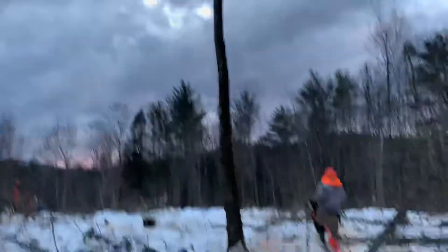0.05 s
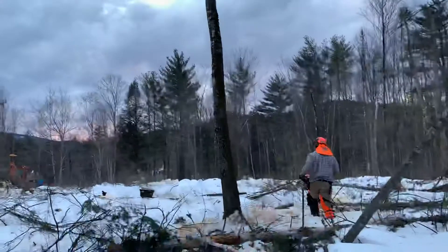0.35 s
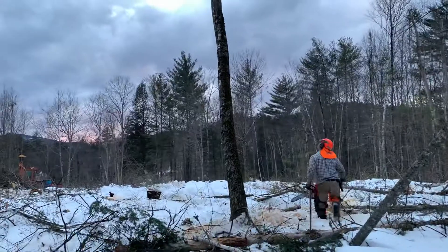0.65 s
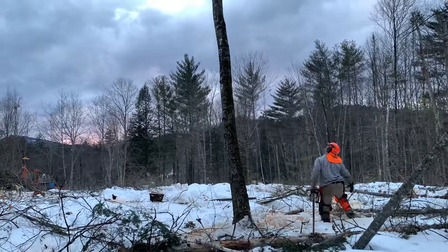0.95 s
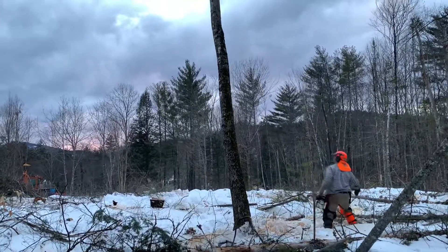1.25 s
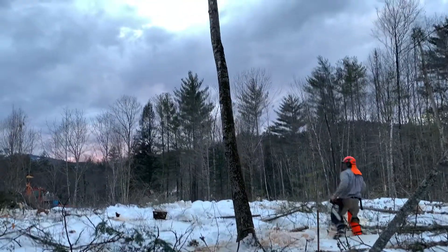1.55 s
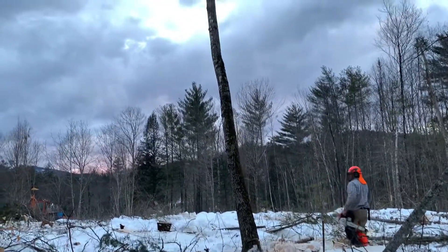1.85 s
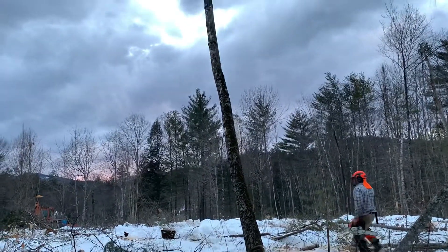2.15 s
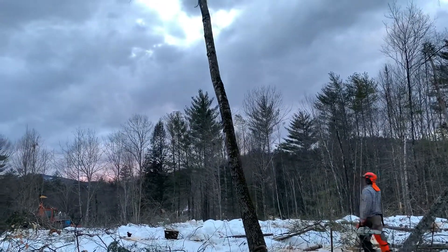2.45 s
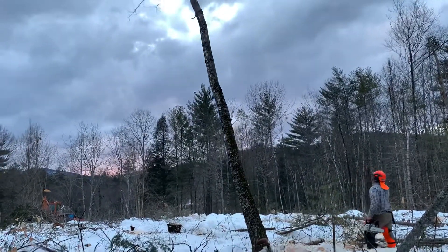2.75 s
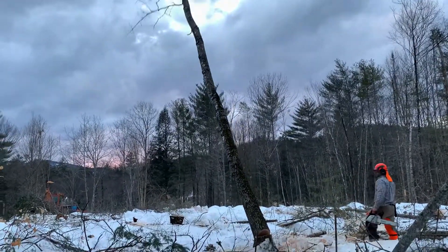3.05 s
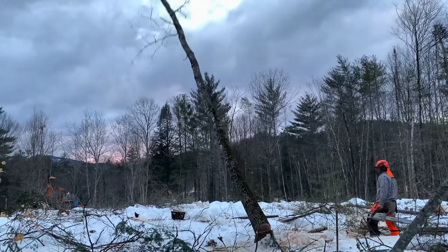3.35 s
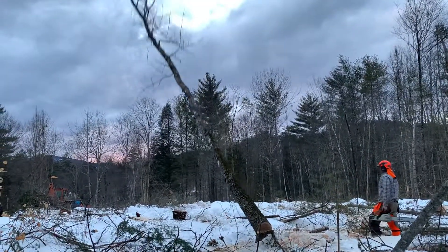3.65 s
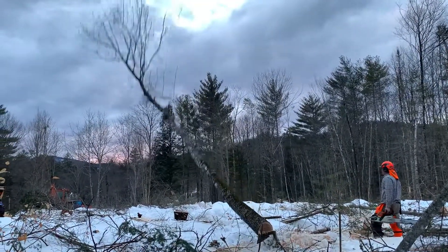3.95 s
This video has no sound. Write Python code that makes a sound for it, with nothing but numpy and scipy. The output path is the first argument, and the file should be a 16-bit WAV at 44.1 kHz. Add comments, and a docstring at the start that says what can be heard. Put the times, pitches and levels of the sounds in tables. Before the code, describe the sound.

A tree trunk cracks as it tips over in a quiet clearing. First a chainsaw coughs to a stop within half a second. Single sharp snaps start around 0.8 seconds and thicken into loud, dense splintering from 1.5 to 3 seconds, over a low groan and a few hollow knocks. From about 3 seconds the wood creaks faster and faster, with two more cracks and a soft thud near 3.8 seconds.

```python
"""Tree falling in snow

A sawn tree tips over in a snowy clearing. The chainsaw coughs to a stop; fibres in the hinge of
uncut wood snap, first singly, then in a dense splintering while the trunk groans. As the fall
gathers speed the hinge creaks in a quickening run of slips, and two last fibres break."""
import sys
import numpy as np
from scipy import signal
from scipy.fft import rfft, irfft, next_fast_len
from scipy.io import wavfile
from scipy.ndimage import uniform_filter1d

SR = 44100
rng = np.random.default_rng(int(sys.argv[2]) if len(sys.argv) > 2 else 0)


def wrap_up_sound(samples):
    """Save the sound to the file named by the first command line argument, as 16-bit audio."""
    columns = np.atleast_2d(samples).T
    # keep every value between -1 and 1, then stretch to whole-number steps
    tamed = np.clip(columns, -1, 1)
    steps = np.round(tamed * 32767).astype(np.int16)
    wavfile.write(sys.argv[1], SR, steps)


N = 176400
TIME = np.arange(N) / SR

# One hit per breaking fibre: (time [s], level [dB], knock EQ [dB], body EQ [dB], treble EQ [dB])
FIBRE_SNAPS = [(0.634, -42, 20, 25, -8.0), (0.7607, -30, 0.5, -9.0, 23), (0.7753, -6, 13, 11, -5.0),
               (0.777, -18, 15, 10.5, 0), (0.8765, -15.5, 1, 14.5, 4), (1.0074, -42, 18.0, 2.5, 18.0),
               (1.0919, -20.5, 25, 6, -7), (1.147, -28.5, 2, -6.0, 17.5), (1.22, -20, -10.5, -14, -13),
               (1.2236, 3.5, -3.5, -10.5, 2.5), (1.2278, -21, 9, -6, 0), (1.2876, -22, -7, -6.0, 10),
               (1.3222, 0, -12.0, -12, 4.5), (1.34, -8.5, -2.5, -6.0, 9), (1.3738, -4.5, -10, -4.0, 9),
               (1.4427, -24, -4.5, -10.5, 15), (1.4486, -4, -21, -11, 5), (1.4636, -5.5, -5.5, -13, -4),
               (1.4845, -3, 0.5, -5.5, 11.5), (1.4879, 0, -5, -7.0, 4), (1.5051, -5.5, -5.0, -1, -1),
               (1.5192, -11, 1, 3.5, 10), (1.5253, -27, 3, -6.5, 21), (1.558, -5.5, -14, -5.0, 4.5),
               (1.5676, 7.0, -0.5, -5.5, -1.5), (1.5724, -5.5, 15, 1.0, 6), (1.5827, -3, 0.0, -13, -2),
               (1.5944, -11, 12, 4, 11.5), (1.6003, 2, 4, 6, 7), (1.6063, -6, 6, -14, 0.0),
               (1.6105, 0, 4, 6, 4), (1.6302, 1.0, -16.0, -1, -1), (1.6457, -17, -3.0, -7.0, 17),
               (1.659, 3.5, 4, -5, 4.5), (1.673, -12.5, 19, 10, -4), (1.68, -8.5, 21, 7, -3),
               (1.6938, 0.5, -9.0, -15.0, -5), (1.7205, 10.5, 0.5, 4, -4), (1.7324, 4, -4, 1.5, -1.5),
               (1.7509, 11.5, 1.5, 2.0, -7.5), (1.755, 6, 3, -1, -3.5), (1.7585, 4.5, -11.0, -4, -8.5),
               (1.7757, 8.5, -6, 4.5, -4), (1.7918, -1, -3, -2, -3.0), (1.8475, -0.5, -11, -11, -8.0),
               (1.851, -6.5, 7, -7, 3), (1.8661, 0.5, -5, -3, 0), (1.8711, 0.5, -4, -3, 9.5),
               (1.8755, 4, -3, 1, -11), (1.8957, -1.5, 11.5, -4, -2.5), (1.9172, 3, -4, -19, -4),
               (1.9262, -14, 3, -8, 6), (1.9576, -2, -20, -14, -2), (1.9901, -1, -7, -3, -9),
               (1.994, -6.5, -10, -10.5, 13), (2.0248, -5.5, 2.0, 2, 9), (2.0354, -6, 5, -2.5, 1),
               (2.0467, 4.0, -7, -1, -2.5), (2.0653, 1, -8, -2, -7.0), (2.1034, -0.5, 12.5, -8, 1),
               (2.1127, -0.5, 3, -1, -0.5), (2.1195, -4.5, -1, -7, 8.5), (2.1698, -0.5, -11, 3.5, 1.5),
               (2.1906, 10, -12, -7.5, -1.5), (2.2168, 0, -6, 3, 3), (2.2383, 9.5, -7, -4.5, -4.5),
               (2.2468, -2, -7.5, -1, 3), (2.25, 8.0, -9, -12, -1.5), (2.3398, 0.5, -14, -12, 3.5),
               (2.366, 3.5, -15, -5, -4), (2.3806, 3.5, -1, 7.5, 2), (2.4013, 13.0, -1.5, -3.5, -4.0),
               (2.409, 3, -6.5, 0.5, -7.0), (2.4426, 15.5, 0.0, -8.0, -13.5), (2.4719, 0.5, 4, 0, 5),
               (2.4958, 7.5, -3, -6, -3.5), (2.5259, 7, -10.5, -12, -3), (2.5363, 5, 2, -10, -2),
               (2.5563, 2.5, -20, -6.0, -12), (2.5645, 9, -13, -13, -14.0), (2.6698, 14.5, 7, 6, -24),
               (2.7063, 6, 0, -9, -10), (2.715, 8, 3.5, 7.5, -11), (2.7632, 2, 14, 9.5, -10),
               (2.8372, 13, -1.5, -2.0, -14), (2.8532, 3, -10, -6, -8), (2.8575, 13, 0, -1.5, -7.5),
               (2.9719, 7.5, -3.5, 0, -4), (3.0637, 5.5, -6, -3, -5.5), (3.7622, 6, -5, 6, -14),
               (3.784, 5, 5.0, 16.5, -7)]
# EQ shared by all the snaps: (frequency [Hz], level [dB])
SNAP_EQ = [(60, -36), (250, -1), (500, -11), (800, -10), (1100, -5.5), (1700, -4), (2600, 0), (4000, -3.5),
           (5500, -9.5), (7200, -2.5), (11000, -4), (13500, -13), (15300, -10), (16000, -15)]
def fibre_snaps():
    """Each fibre frays, parts with a sharp click and tears out; thick ones have more knock and body."""
    knock_hz, body_hz, edge_hz, treble_hz = 940, 1770, 3700, 9400
    tear_in_s, tear_out_s, fray_s = 0.00071, 0.00097, 0.0014
    out = np.zeros(N)
    t = np.arange(-400, 700) / SR  # the fibre parts at t = 0
    tear = np.exp(np.where(t < 0, t / tear_in_s, -t / tear_out_s))
    tear += from_db(-29) * np.exp(-np.abs(t) / fray_s)
    for s, db, knock_db, body_db, treble_db in FIBRE_SNAPS:
        grit = from_db(-2.5) * unit_energy(rng.laplace(size=len(t)) * tear)
        snap = whiten(grit - (t == 0))
        tone = [(350, 0), (knock_hz, knock_db), (body_hz, body_db), (edge_hz, 0), (treble_hz, treble_db)]
        add(out, s + t[0], from_db(db + 0.48) * eq(snap, tone))
    low_cut = signal.butter(2, 610, "high", fs=SR, output="sos")
    return signal.sosfilt(low_cut, eq(out, SNAP_EQ))


# Fader ride of the small fibres tearing, which also drives their density: (time [s], level [dB])
SPLINTER_RIDE = [(.7, -79), (.94, -64), (1.0, -62), (1.1, -56.5), (1.19, -66), (1.42, -56), (1.54, -53),
                 (1.6, -43.5), (1.7, -50), (1.76, -33), (1.82, -41.5), (1.87, -41.5), (1.96, -43),
                 (2.05, -37), (2.11, -34.5), (2.155, -41.5), (2.23, -30), (2.29, -37), (2.4, -33),
                 (2.48, -33), (2.6, -28), (2.66, -32), (2.78, -37), (2.86, -34.5), (2.92, -37), (3.08, -37),
                 (3.2, -39), (3.36, -39.5), (3.5, -44.5), (4, -51)]
# Bright, crisp EQ of the crackle: (frequency [Hz], level [dB])
SPLINTER_EQ = [(100, -15.5), (500, -3.5), (800, -7), (1100, -3.5), (1700, -3), (2600, 1.5), (4000, -0.5),
               (5500, -1.5), (7500, -0.5), (11000, 0), (13500, -9), (15300, -7), (16000, -20)]
def splinters():
    """Small fibres give way in clumps over a fine hiss: ticks under light strain, crackle under heavy."""
    busy_ticks_per_s, busy_db, clump_db = 1300, -32, 3
    level_db, = over_time(SPLINTER_RIDE)
    chance = (busy_ticks_per_s * from_db(1.25 * (level_db - busy_db)) + 30) / SR
    sizes = unit_rms(from_db(4 * np.minimum(rng.exponential(1, N), 3))) * rng.choice([-1, 1], N)
    ticks = sizes * (rng.random(N) < chance) / np.sqrt(chance)
    hiss = from_db(-9.5) * rng.standard_normal(N)
    crackle = (ticks + hiss) * from_db(clump_db * drift(per_s=60))
    level_db = np.where(TIME < SPLINTER_RIDE[0][0], -120, level_db)  # muted until the ride starts
    return from_db(level_db) * unit_rms(eq(crackle, SPLINTER_EQ))


# Speed and fader ride of the slipping hinge: (time [s], rate [slips/s], level [dB])
CREAK_RIDE = [(2.7, 79, -120), (2.85, 73.5, -41.5), (3.0, 85.6, -39.5), (3.13, 76.4, -36), (3.19, 90, -34),
              (3.25, 93, -35.5), (3.33, 105.5, -33), (3.42, 133, -33.5), (3.48, 142, -33.5),
              (3.565, 148, -32), (3.585, 184, -32.5), (3.65, 191, -32.5), (3.69, 228, -30.5),
              (3.75, 210, -33), (3.82, 275, -34), (3.88, 260, -35.5), (3.94, 226, -36), (4, 251, -37.5)]
# Woody resonances of the creak: (frequency [Hz], level [dB])
CREAK_EQ = [(70, -11), (200, -1), (330, -7), (560, -12.5), (800, -10.5), (1050, 4), (1300, 3), (1580, 4),
            (2000, 2.5), (2350, 6), (2700, 0.5), (3000, -6), (3450, 1.5), (3850, -5), (4280, 2.5),
            (4800, -5.5), (5700, 2.5), (7000, -8.5), (8700, -2), (10800, -3.5), (12200, -15), (13200, -26),
            (16000, -23)]
def hinge_creak():
    """Stick and slip: a click per slip and a short rasp after it, faster as the tree falls."""
    jitter, rasp_cycles = 0.02, 0.4
    rate, level_db = over_time(CREAK_RIDE)
    cycles = np.cumsum(rate * (1 + jitter * drift(per_s=150))) / SR
    strength = from_db(rng.standard_normal(N)) / np.sqrt(rate)
    slips = np.diff(np.floor(cycles), prepend=0) * strength
    rasp = rng.laplace(size=N) * np.exp(-(cycles % 1) / rasp_cycles)
    friction = from_db(-1) * unit_rms(rasp) - unit_rms(slips)
    return from_db(level_db) * unit_rms(eq(friction, CREAK_EQ))


# Low resonances of the trunk: (frequency [Hz], bandwidth [Hz], level [dB])
GROAN_MODES = [(170, 63, -4), (254.5, 34, -1), (299, 56, -5), (361, 72, 2)]
# Fader ride of the groan: (time [s], level [dB])
GROAN_RIDE = [(.7, -83), (.8, -63), (1.05, -66.5), (1.25, -63), (1.53, -74), (1.6, -48.5), (2.0, -52.5),
              (2.35, -50.5), (2.45, -43.5), (2.67, -41.5), (2.8, -40.5), (3.02, -46.5), (3.2, -48.5),
              (3.4, -56), (3.7, -54.5), (3.8, -48), (4, -52)]
def trunk_groan():
    """The tearing shakes the trunk's low modes."""
    level_db, = over_time(GROAN_RIDE)
    modes = sum(from_db(db) * ringing_noise(hz, width) for hz, width, db in GROAN_MODES)
    high_cut = signal.butter(4, 430, fs=SR, output="sos")
    return from_db(level_db) * unit_rms(signal.sosfilt(high_cut, modes))


# One damped tone per hit: (time [s], pitch [Hz], level [dB], 60 dB decay [s])
KNOCKS_AND_THUDS = [(0.793, 298, -37, 0.052), (0.897, 356, -42.5, 0.054), (1.091, 1030, -37, 0.016),
                    (1.673, 880, -35, 0.02), (1.679, 1060, -28, 0.023), (1.906, 262, -36, 0.063),
                    (2.328, 92.5, -31.5, 0.075), (2.61, 348, -35, 0.28), (2.858, 249.6, -22.5, 0.18),
                    (2.858, 309, -26, 0.094), (2.975, 249, -36.5, 0.79), (3.785, 152, -32.5, 0.24),
                    (3.844, 57, -31, 0.19)]
def knocks_and_thuds():
    """Hollow wooden knocks and two low, soft thuds like footsteps in snow."""
    out = np.zeros(N)
    attack = 1 - np.exp(-TIME / 0.0023)
    for s, hz, db, t60 in KNOCKS_AND_THUDS:
        add(out, s, from_db(db - 60 * TIME / t60) * np.sin(2 * np.pi * hz * TIME) * attack)
    return out


# Last firings of the engine: (time [s], level [dB])
ENGINE_COUGHS = [(.001, -6.5), (0.03, -4), (0.06, 1), (.099, -1.5), (0.16, -2), (0.218, -5.5), (0.286, -11),
                 (.374, -12.5)]
# Boomy EQ of a puff: (frequency [Hz], level [dB])
COUGH_EQ = [(50, -15), (130, 11.5), (200, 9.5), (285, 10.5), (480, 0), (800, -13), (1500, -15), (3400, -11),
            (8000, -25), (16000, -39)]
# Fade of the chain running down: (time [s], level [dB])
CHAIN_FADE = [(0, -35), (.09, -42), (.16, -49), (.28, -54.5), (.47, -64.5), (.56, -61.5), (.66, -64),
              (.8, -65)]
# Midrange EQ of the rattle: (frequency [Hz], level [dB])
CHAIN_EQ = [(100, -6), (280, 8.5), (500, -10), (800, -1.5), (1100, -3.5), (1550, 0), (2200, -8.5),
            (4200, -16), (6000, -19.5), (11000, -31.5), (16000, -38)]
def chainsaw():
    """The engine's last puffs slow and weaken while the chain's rattle sinks to a faint trace."""
    gas_decay_s, rattle_db = 0.0076, 4.14
    puffs, t = np.zeros(N), TIME[:SR // 20]
    for s, db in ENGINE_COUGHS:
        gas = unit_energy(rng.standard_normal(len(t)) * np.exp(-t / gas_decay_s))
        add(puffs, s, from_db(db) * whiten((t == 0) + from_db(-3.5) * gas))
    chain_db, = over_time(CHAIN_FADE)
    rattle = from_db(chain_db + rattle_db * drift(per_s=200))
    chain = rattle * unit_rms(eq(rng.standard_normal(N), CHAIN_EQ))
    return eq(puffs, COUGH_EQ) + chain


def snow_bounce(x):
    """The direct sound plus a duller copy that bounces off the snow just behind it."""
    lag_s, gain, high_cut_hz = 0.00116, 0.51, 5100
    dull = signal.lfilter(*signal.butter(1, high_cut_hz, fs=SR), x)
    return x + gain * np.interp(TIME - lag_s, TIME, dull, left=0)


# Stereo image: (frequency [Hz], left phase lead [rad], left minus right [dB])
STEREO_IMAGE = [(300, 0, 0), (550, 0, -2), (1100, -.35, -1.8), (1800, -.8, -1.6), (2400, 0, -.8),
                (3300, .7, -2.5), (4500, .4, -2), (4950, 2, -8), (5800, 2.8, -6), (6600, 3.8, -2.5),
                (7700, 3.9, .5), (8600, 3.1, 0), (10000, 1.1, 0), (11600, -.3, 0), (12700, -2.6, 0),
                (13500, -3.2, 0), (14200, -3.8, 0), (15100, -5.8, 0), (16000, -6.2, 0)]
def stereo_ports(x):
    """Direct sound reaches two microphone ports with phase and level gaps that vary with frequency."""
    size = 2 * next_fast_len(N // 2 + 2048)
    phase, balance_db = over_bins(STEREO_IMAGE, size)
    left = from_db(balance_db / 2) * np.exp(.5j * phase)
    pair_rms = np.sqrt((from_db(balance_db) + from_db(-balance_db)) / 2)
    return irfft(rfft(x, size) * np.array([left, 1 / left]) / pair_rms)[:, :N]


# EQ of the halo around the clicks: (frequency [Hz], level [dB])
HALO_EQ = [(300, -20.5), (700, -0.5), (1500, 2.5), (2000, 6.5), (3500, 3), (5600, 9.5), (8000, -1.5),
           (11000, 5), (16000, -22)]
def stereo_halo(x):
    """A brief noise halo, different on each side, widens each click."""
    blur_s = 0.0012
    pole = np.exp(-1 / (blur_s * SR))
    envelope = np.sqrt(signal.lfilter([1 - pole], [1, -pole], x ** 2))
    return from_db(-10.5) * np.array([eq(envelope * n, HALO_EQ) for n in rng.standard_normal((2, N))])


# EQ on the reverb return: (frequency [Hz], level [dB])
REVERB_EQ = [(100, -1.5), (350, -1.5), (800, 6), (2000, 3.5), (6000, 5), (16000, -11)]
def woods_reverb(x):
    """Scatter from nearby brush and a faint tail from the tree line, different on each side."""
    brush_t60_s, trees_t60_s = 0.1, 0.15
    t, sides = TIME[:SR], []
    for near, far in rng.standard_normal((2, 2, SR)):
        brush = from_db(-16.5) * unit_energy(near * from_db(-60 * t / brush_t60_s))
        trees = from_db(-19.5) * unit_energy(far * from_db(-60 * t / trees_t60_s))
        sides.append(signal.fftconvolve(x, eq(brush + trees, REVERB_EQ))[:N])
    return np.array(sides)


# Dark EQ of the ambience bed: (frequency [Hz], level [dB])
AIR_EQ = [(20, 5.5), (40, 8), (65, 9.5), (95, -4), (160, -0.5), (300, -6.5), (550, -9.5), (900, -7),
          (1700, -27), (4000, -19), (8000, -39), (16000, -33)]
def open_air():
    """Quiet outdoor rumble with a low, distant hum."""
    mid, side = [unit_rms(eq(n, AIR_EQ)) for n in rng.standard_normal((2, N))]
    rumble = mid + 0.35 * side * [[1], [-1]]
    hum = ringing_noise(hz=63.5, width_hz=12.4)
    return from_db(-56.5) * rumble + from_db(-57.5) * hum


def from_db(db):
    """Decibels to gain."""
    return 10 ** (np.asarray(db) / 20)


def unit_rms(x):
    """Scale to an RMS of 1."""
    return x / np.sqrt(np.mean(x ** 2) + 1e-20)


def unit_energy(x):
    """Scale to an energy of 1."""
    return x / np.sqrt(np.sum(x ** 2) + 1e-20)


def over_time(rows):
    """The columns of an automation curve at every sample."""
    s, *columns = np.transpose(rows)
    return [np.interp(TIME, s, c) for c in columns]


def over_bins(rows, size):
    """The columns of a frequency table at every FFT bin."""
    hz, *columns = np.transpose(rows)
    bin_hz = np.arange(size // 2 + 1) * SR / size
    return [np.interp(np.log(bin_hz + 1), np.log(hz), c) for c in columns]


def eq(x, curve):
    """Minimum-phase EQ through points of (frequency [Hz], level [dB])."""
    size = 2 * next_fast_len(len(x) // 2 + 512)
    cepstrum = irfft(np.log(from_db(over_bins(curve, size)[0])))
    cepstrum[1:size // 2] *= 2
    cepstrum[size // 2 + 1:] = 0
    return irfft(rfft(x, size) * np.exp(rfft(cepstrum)))[:len(x)]


def whiten(x):
    """Level out a burst's spectrum, keeping its grain; unit energy."""
    spectrum = rfft(x)
    smooth_power = uniform_filter1d(np.abs(spectrum) ** 2, size=21)
    return unit_energy(irfft(spectrum / np.sqrt(smooth_power + 1e-12)))


def drift(per_s):
    """A modulator that glides between random values of spread 1."""
    knots = rng.standard_normal(N // 20)
    return np.interp(TIME * per_s, np.arange(len(knots)), knots)


def ringing_noise(hz, width_hz):
    """Noise through one resonance, at unit RMS."""
    r = np.exp(-np.pi * width_hz / SR)
    feedback = [1, -2 * r * np.cos(2 * np.pi * hz / SR), r * r]
    return unit_rms(signal.lfilter([1, 0, -1], feedback, rng.standard_normal(N)))


def add(out, s, sound):
    """Mix a sound in at s seconds."""
    i = int(np.clip(s * SR, 0, N - 1))
    out[i:i + len(sound)] += sound[:N - i]


def scene():
    """Hinge, trunk and saw in the clearing."""
    hinge = snow_bounce(fibre_snaps() + splinters() + hinge_creak())
    direct = hinge + trunk_groan() + knocks_and_thuds() + chainsaw()
    return stereo_ports(direct) + stereo_halo(hinge) + woods_reverb(direct) + open_air()


def record(dry):
    """Clip at full scale, then cut the top steeply at 16 kHz."""
    high_cut = signal.ellip(10, .1, 80, 16000, fs=SR, output="sos")
    return signal.sosfilt(high_cut, np.clip(dry, -1, 1))


dry = scene()
out = record(dry)
wrap_up_sound(out)
```